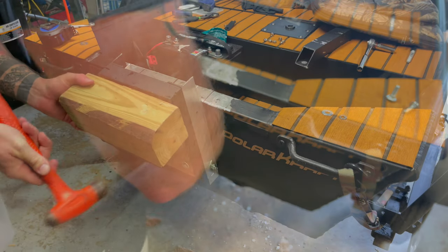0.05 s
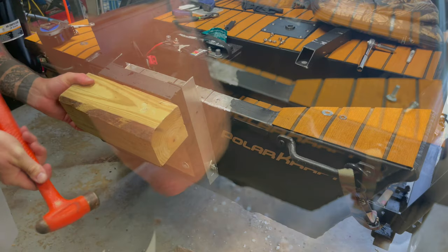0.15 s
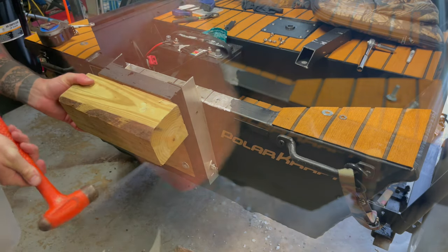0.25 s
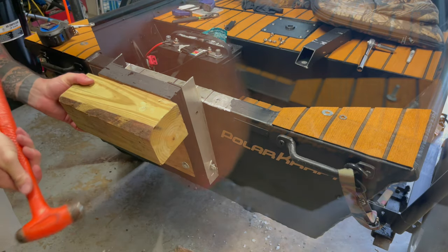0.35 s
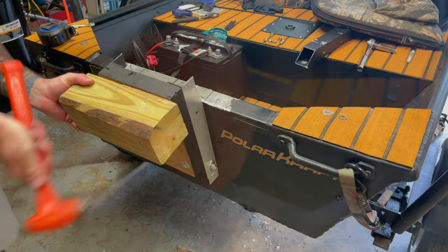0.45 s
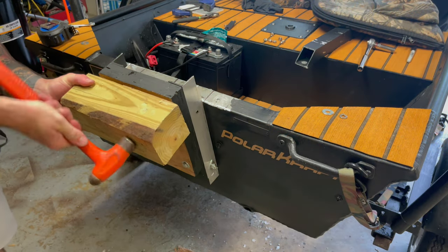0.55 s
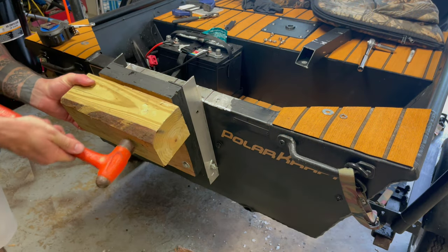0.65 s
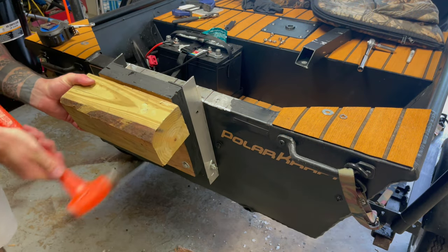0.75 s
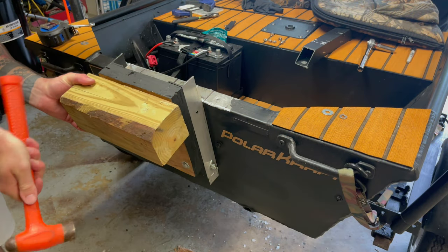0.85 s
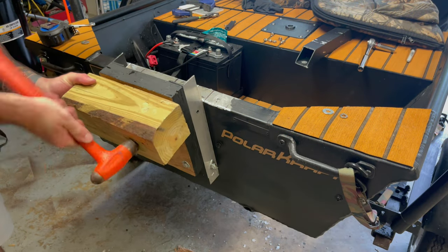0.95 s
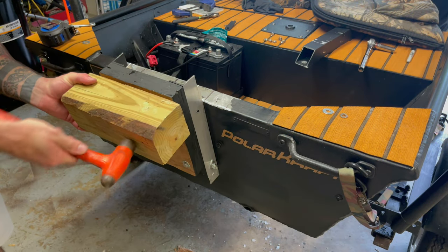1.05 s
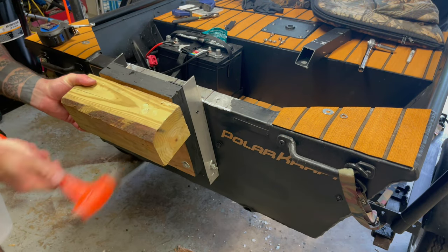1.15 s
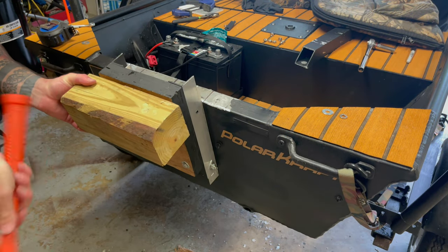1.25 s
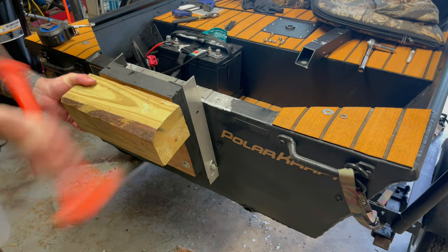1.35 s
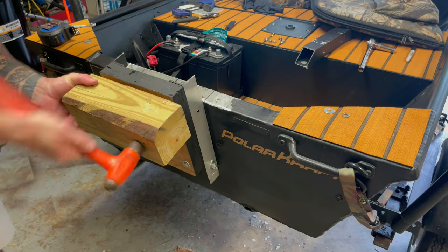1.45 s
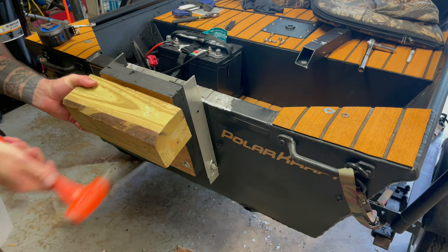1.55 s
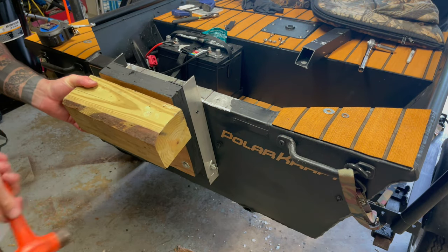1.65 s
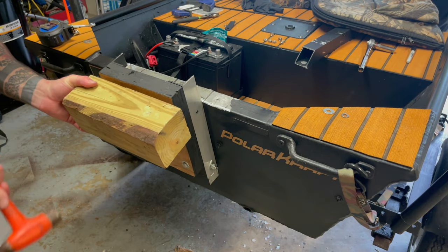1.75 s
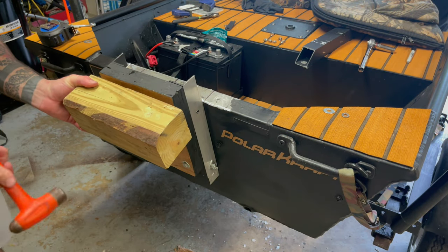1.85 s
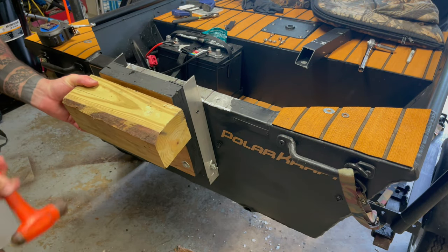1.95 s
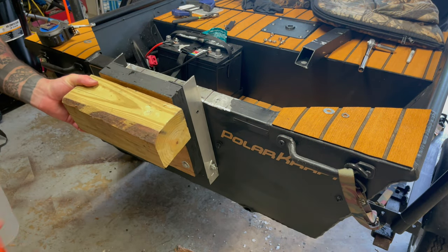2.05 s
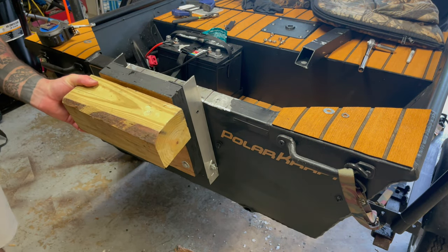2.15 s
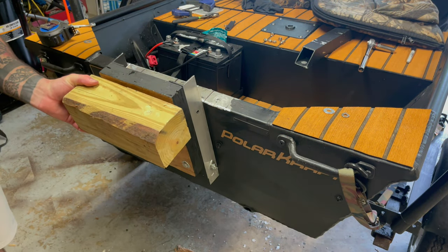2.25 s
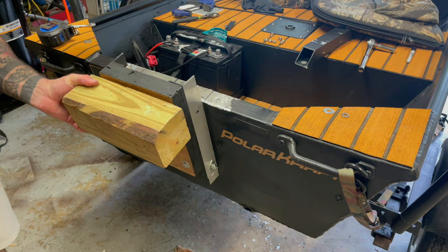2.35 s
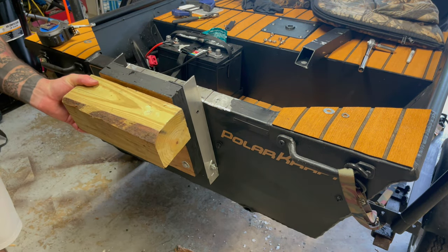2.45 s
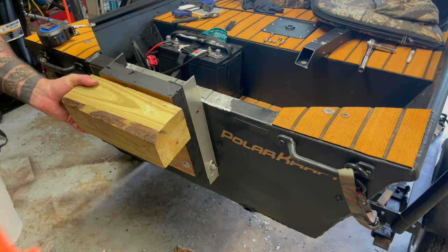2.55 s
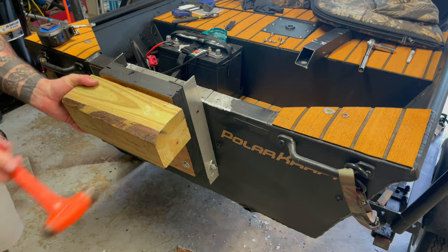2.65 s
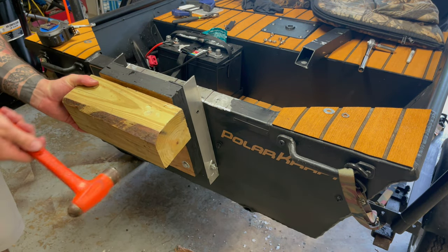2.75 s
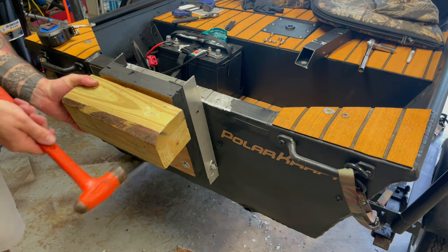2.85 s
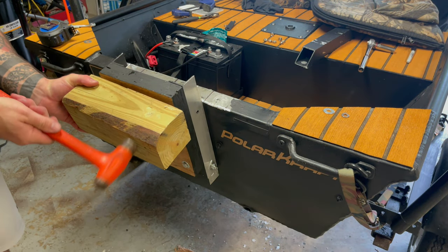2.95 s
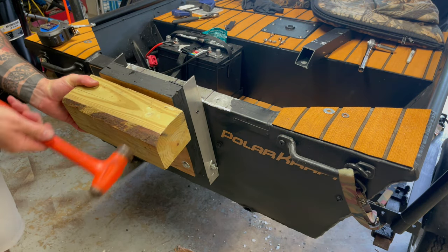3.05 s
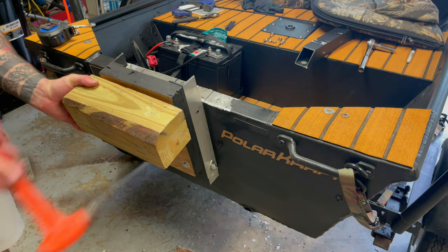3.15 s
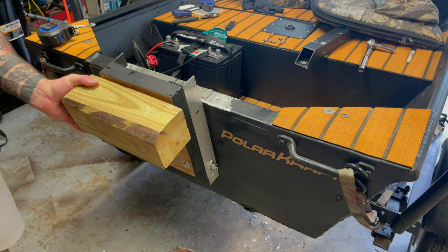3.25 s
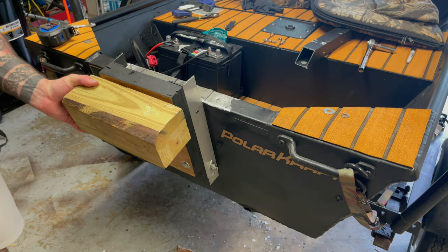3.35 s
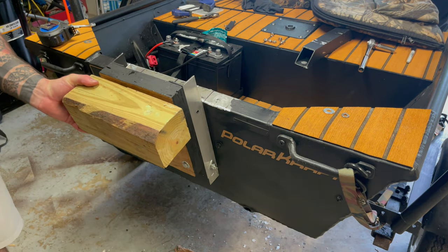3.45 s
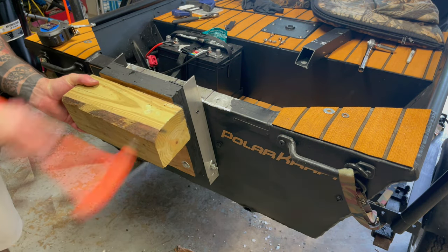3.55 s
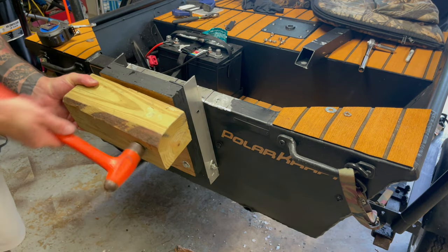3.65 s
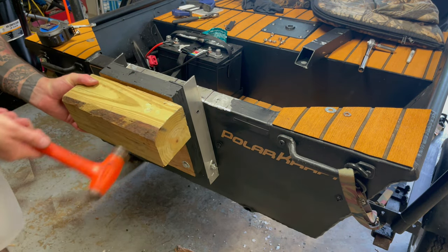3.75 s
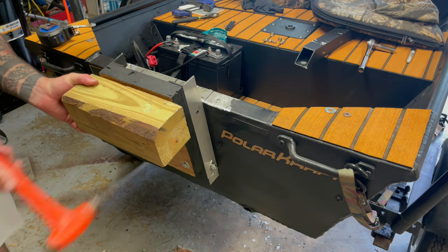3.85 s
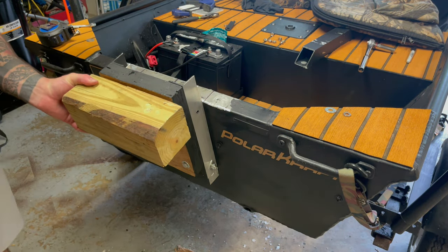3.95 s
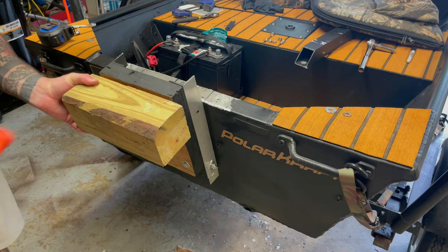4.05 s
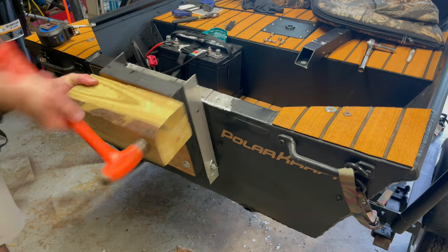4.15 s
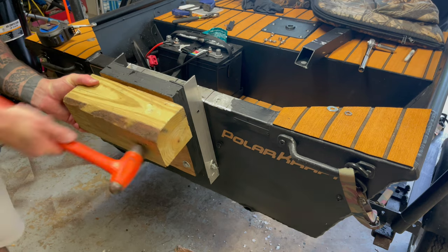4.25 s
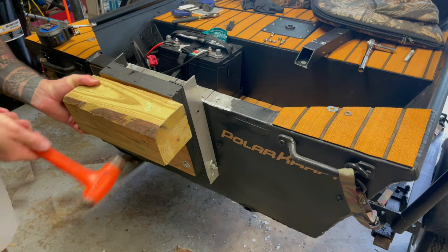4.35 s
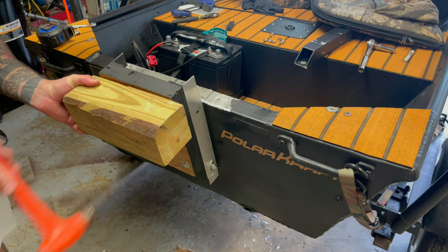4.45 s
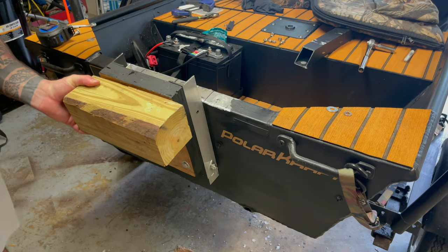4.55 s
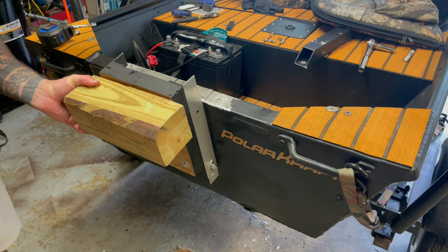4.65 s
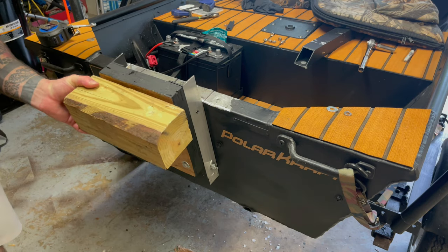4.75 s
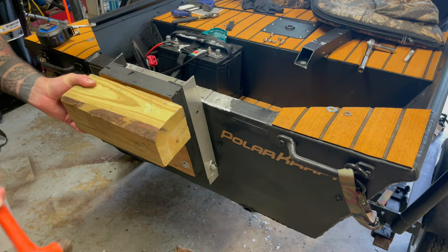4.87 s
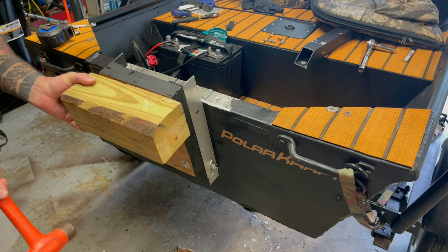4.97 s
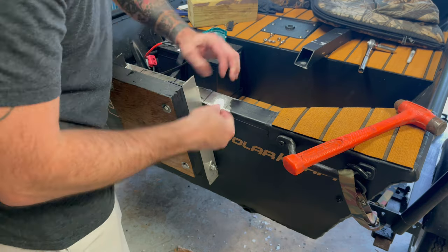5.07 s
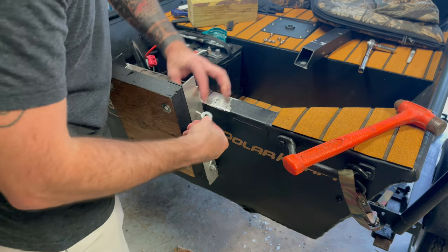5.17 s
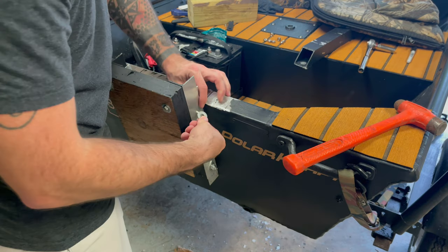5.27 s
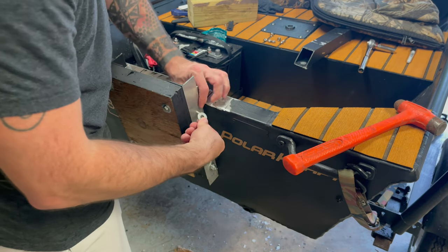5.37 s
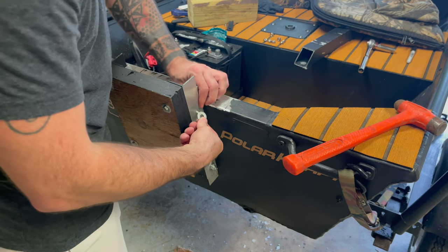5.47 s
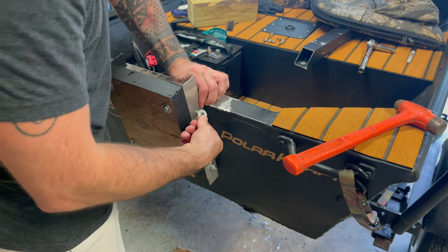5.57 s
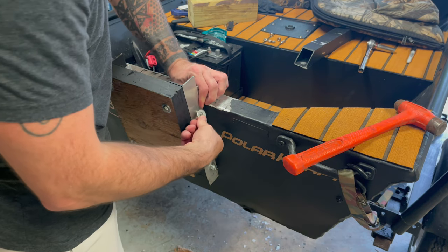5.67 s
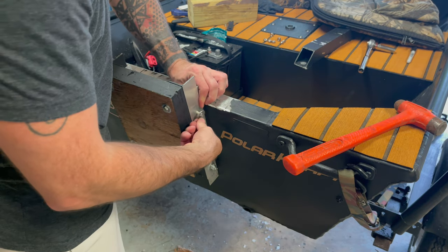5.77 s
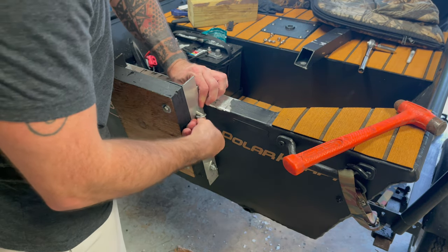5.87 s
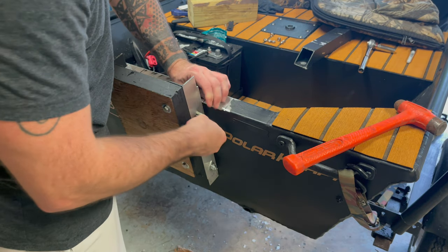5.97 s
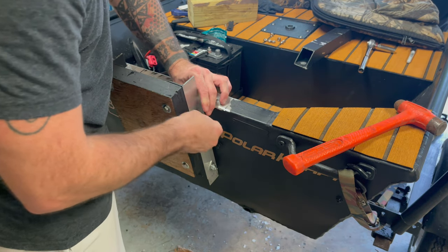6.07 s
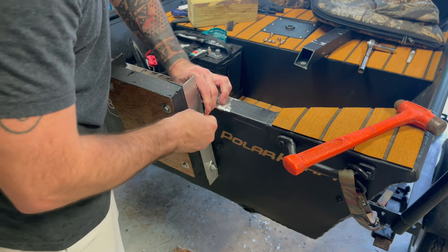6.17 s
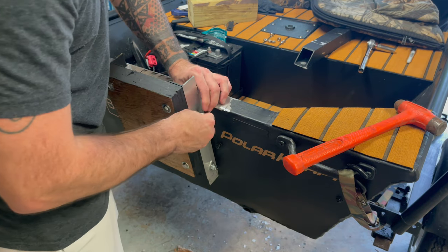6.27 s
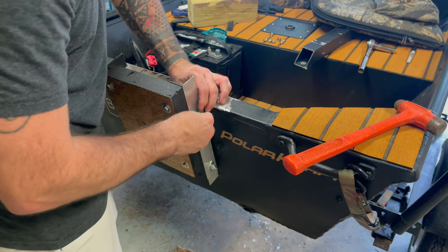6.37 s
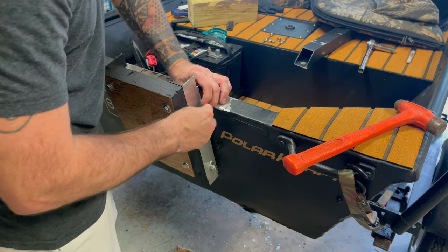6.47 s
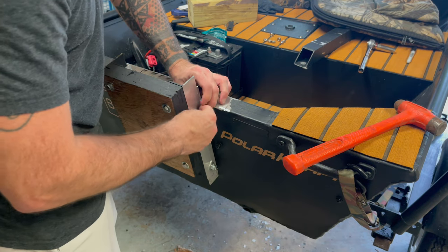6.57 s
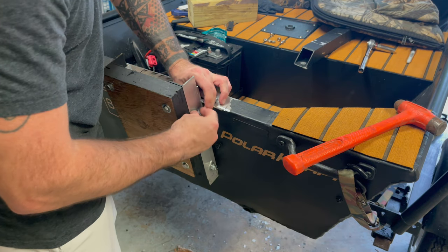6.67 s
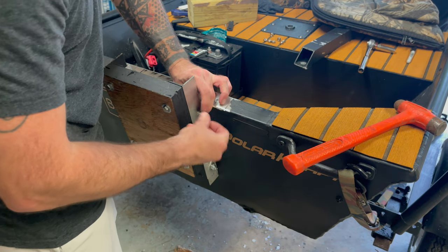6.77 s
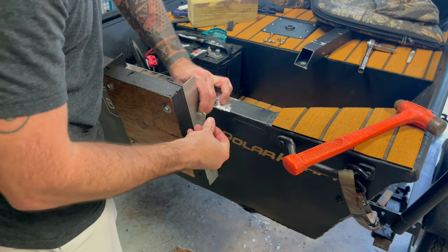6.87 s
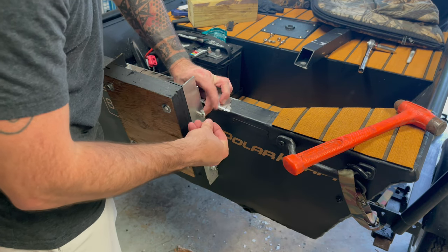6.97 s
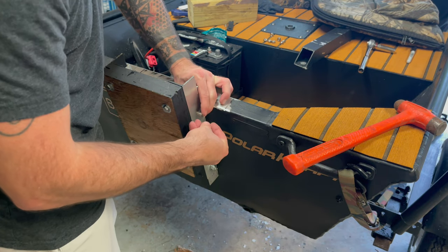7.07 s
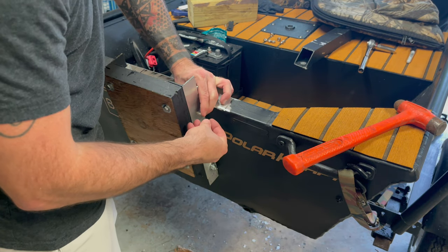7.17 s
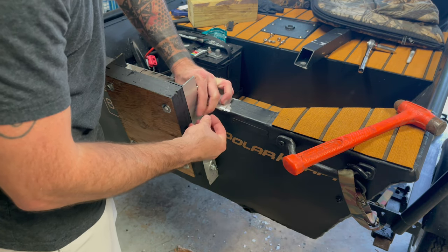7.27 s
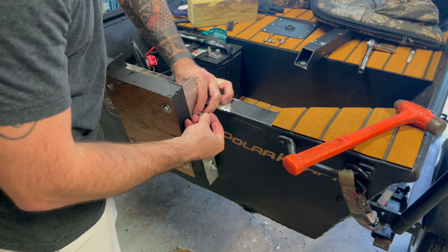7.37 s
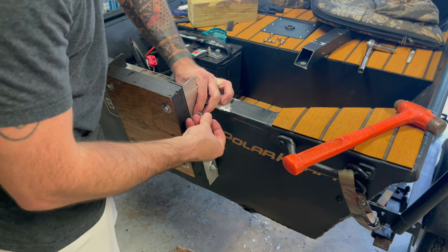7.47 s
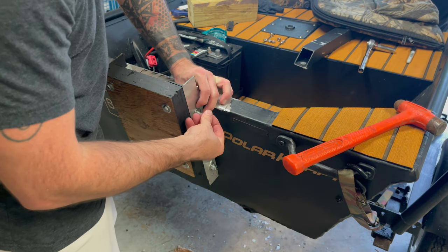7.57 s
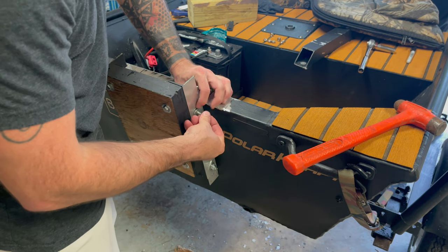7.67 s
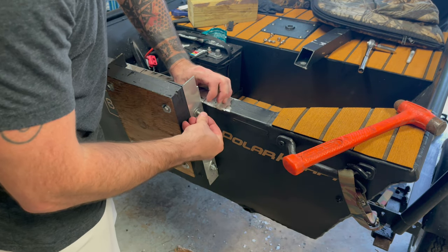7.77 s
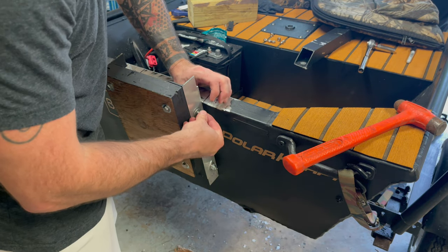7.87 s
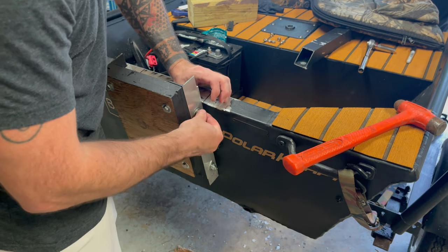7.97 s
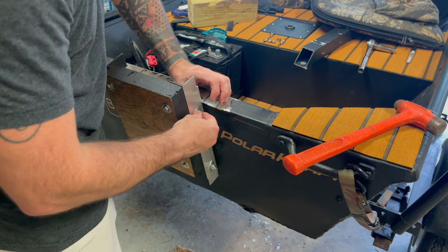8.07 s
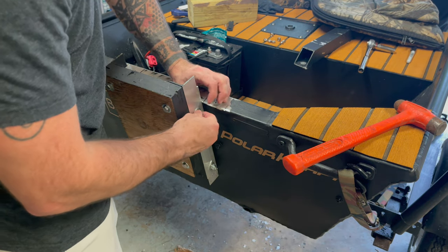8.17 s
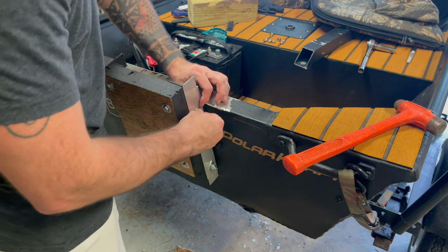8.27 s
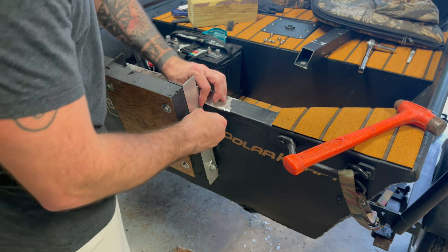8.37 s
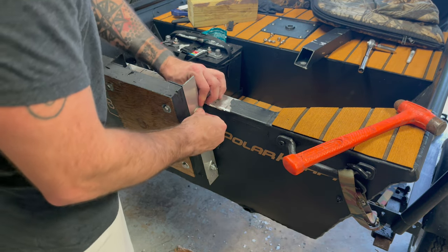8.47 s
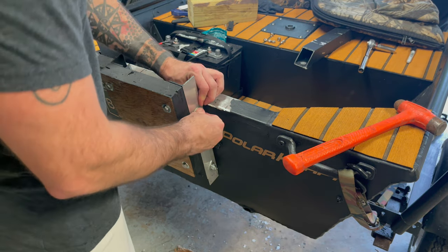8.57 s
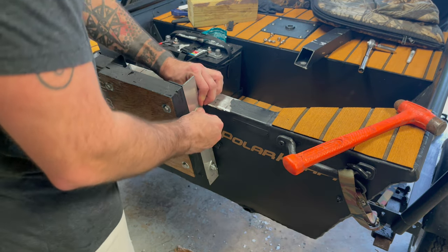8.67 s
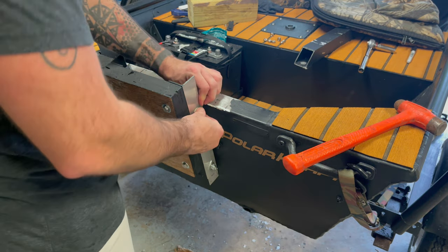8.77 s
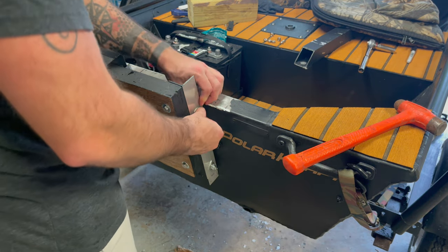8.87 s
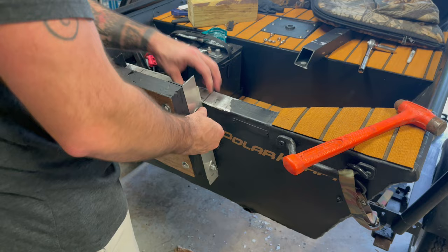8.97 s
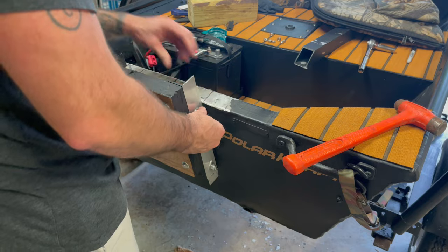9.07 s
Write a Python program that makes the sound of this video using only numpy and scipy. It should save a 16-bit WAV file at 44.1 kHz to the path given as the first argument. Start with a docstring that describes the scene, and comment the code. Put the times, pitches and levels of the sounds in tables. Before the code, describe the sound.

Six mallet blows land on a wooden block against a metal hull, in two groups of three. Most crack sharply, with a boom and a clanging rattle, and the loudest distort slightly. A faint bump follows. The second half is much quieter, as fingers work a bolt against a plate, scuffing, ticking and clinking. Garage hum and hiss continue underneath.

```python
"""A garage hums and hisses throughout, with brief narrow-band noise swells. From 0.5 s a mallet drives
a wooden block against a plate on the stern of a metal boat: the face cracks, the block knocks, the hull
booms and rattles. The loudest blows clip; buzzes follow the two heavy ones at 3.6 and 4.1 s. Two soft
blows land near 4.9 s, then the level dips briefly. Fingers, heard twice between the blows, fit a bolt
from 5.3 s on with small ticks, scuffs and clinks."""
import sys
import numpy as np
from scipy import signal
from scipy.fft import rfft, irfft, next_fast_len
from scipy.io import wavfile
from scipy.ndimage import uniform_filter1d

SR = 44100
rng = np.random.default_rng(int(sys.argv[2]) if len(sys.argv) > 2 else 0)


def materialize(psi):
    """Save the field psi as 16-bit PCM at rate SR to the path in sys.argv[1].

    A 1-D psi becomes a single channel; in a 2-D psi each row is a channel.
    """
    bounded = np.clip(np.atleast_2d(psi).T, -1, 1)
    quanta = np.round(bounded * 32767).astype(np.int16)
    wavfile.write(sys.argv[1], SR, quanta)


N = 402191


def amp(db):
    """Decibels to amplitude."""
    return 10 ** (np.asarray(db) / 20)


def unit_rms(x):
    """Scale to rms 1."""
    return x / np.sqrt(np.mean(x ** 2) + 1e-20)


def curve_at(points, hz):
    """Interpolate (Hz, value) points on a log frequency axis."""
    points_hz, values = np.transpose(points)
    return np.interp(np.log(hz + 1), np.log(points_hz + 1), values)


def filtered(x, response):
    """Apply a frequency response by FFT."""
    n = x.shape[-1]
    padded = next_fast_len(n + 4096)
    return irfft(rfft(x, padded) * response(np.fft.rfftfreq(padded, 1 / SR)), padded)[..., :n]


def noise(n, spectrum, field=lambda hz, t: 1):
    """Two unrelated coloured noises at rms 1, then shaped by a time-frequency gain field."""
    white = rng.standard_normal((2, n))
    pair = unit_rms(filtered(white, lambda hz: amp(curve_at(spectrum, hz))))
    hz, t, cells = signal.stft(pair, SR, nperseg=256)
    return signal.istft(cells * field(hz[:, None], t), SR, nperseg=256)[1][:, :n]


def flicker(depth_db):
    """A random gain field, smooth in frequency and time."""
    def field(hz, t):
        across_bands = uniform_filter1d(rng.standard_normal((len(hz), len(t))), size=4, axis=0)
        return amp(depth_db * unit_rms(uniform_filter1d(across_bands, size=14, axis=1)))
    return field


def ring(modes, t, scatter_db, rise_s, sustain=1, waver_db=0):
    """Damped, wavering modes on two paths, each slightly detuned; signs are random on the second."""
    hz, db, t60_s = np.transpose(modes)[:, :, None]
    draws = rng.standard_normal((4, len(modes), 1))
    strength, detune, polarity = draws[0], draws[1:3], np.sign(draws[3])
    knots = rng.standard_normal((2, len(modes), 41))
    waver = np.array([[np.interp(t, np.arange(41) / 40, k) for k in path] for path in knots])
    level_db = db + scatter_db * strength + waver_db * waver - 60 * t / (t60_s * sustain)
    envelope = amp(level_db) * (1 - np.exp(-t / rise_s))
    envelope[1] *= polarity
    return (envelope * np.sin(2 * np.pi * hz * (1 + 0.0085 * detune) * t)).sum(1)


def add(out, start_s, sound):
    """Mix a sound in from start_s."""
    part = out[:, round(start_s * SR):][:, :sound.shape[1]]
    part += sound[:, :part.shape[1]]


# Each row: time in seconds, then hiss, rush and rumble levels in dB.
ROOM_LEVELS = [(0, -32, -38.5, -45), (.4, -34, -36.5, -43.5), (.92, -30, -41.5, -30.5),
               (1.33, -38.5, -39, -43), (1.55, -50, -45, -39), (2.1, -48, -50, -56.5),
               (2.8, -47, -49, -60.5), (3.45, -46, -47.5, -62), (4.2, -47, -45, -48),
               (4.5, -53, -53.5, -55), (4.9, -47.5, -49.5, -48), (5.18, -50.5, -54.5, -76.5),
               (5.7, -49.5, -52, -76.5), (6.1, -42.5, -45, -65), (6.55, -40.5, -39.5, -51.5),
               (7.0, -40.5, -44, -57), (7.4, -38.5, -39.5, -52.5), (7.9, -38, -39.5, -51.5),
               (8.4, -37.5, -42, -48.5), (9.12, -36, -38, -50)]
# Room noise spectra. Each row: frequency in Hz, level in dB.
RUMBLE_SPECTRUM = [(15, -43.5), (30, -23.5), (55, 3), (85, -8.5), (118, 2), (150, -9), (230, -10.5),
                   (300, -20.5), (400, -17), (600, -38.5), (1000, -120)]
RUSH_SPECTRUM = [(210, -42), (350, -16.5), (597, 2), (780, 0), (1110, 1), (1240, 0), (1350, 0.5),
                 (1830, 1.5), (4500, -5), (5850, -36.5), (9900, -120)]
HISS_SPECTRUM = [(2500, -10), (4000, -6), (5200, -2.5), (6100, 1.5), (7200, -4.5), (9000, -6), (10500, -6),
                 (11700, -11), (12300, -26.5), (12500, -120)]
# Each row: frequency in Hz, level over the rumble in dB.
HUM_TONES = [(118.4, -10), (689, -12.5)]
DUCK_DB, DUCK_DELAY_S, DUCK_DB_PER_S = -49, 0.19, 60.5
LINGER_RUSH_DB, LINGER_RUMBLE_DB, LINGER_T60_S = -23, -20, 1.035


def garage():
    """Hum, rumble, rush and hiss. Blows linger in rumble and rush; the hiss dips after a loud crack."""
    t = np.arange(N) / SR
    times_s, *levels_db = np.transpose(ROOM_LEVELS)
    hiss_db, rush_db, rumble_db = [np.interp(t, times_s, column) for column in levels_db]
    linger = np.zeros(N)
    for start_s, _, _, crack_db, hull_db, *_ in MALLET_BLOWS:
        after = (t > start_s) & (t < DIP_AT_S)
        linger += after * amp(hull_db - 60 * np.abs(t - start_s) / LINGER_T60_S)
        if crack_db > -20:
            ceiling_db = DUCK_DB + DUCK_DB_PER_S * np.abs(t - start_s - DUCK_DELAY_S)
            hiss_db = np.where(after, np.minimum(hiss_db, ceiling_db), hiss_db)
    waver = unit_rms(uniform_filter1d(rng.standard_normal(N), size=6000))
    tones = sum(amp(db + 0.92 * waver) * np.sin(2 * np.pi * hz * t) for hz, db in HUM_TONES)
    hum = amp(rumble_db) * tones * [[1], [.3]]
    rumble_gain = np.hypot(amp(rumble_db), amp(LINGER_RUMBLE_DB) * linger)
    rush_gain = np.hypot(amp(rush_db), amp(LINGER_RUSH_DB) * linger)
    rumble = rumble_gain * noise(N, RUMBLE_SPECTRUM, flicker(depth_db=1.5))
    rush = rush_gain * noise(N, RUSH_SPECTRUM, flicker(depth_db=3.32))
    hiss = amp(hiss_db) * noise(N, HISS_SPECTRUM, flicker(depth_db=2.5))
    return hum + rumble + rush + hiss


# Each row: start in seconds, level in dB, centre in Hz, width in Hz, length in seconds.
NOISE_SWELLS = [(0.317, -34, 1920, 150, .093), (.863, -29.5, 1550, 200, 0.096),
                (1.185, -38, 2660, 300, .12), (1.829, -47.5, 226, 80, 0.15), (2.315, -49.5, 553, 99, 0.13),
                (2.39, -48, 697, 80, .12), (3.598, -46.5, 3600, 400, 0.17), (3.734, -37, 1280, 500, 0.14),
                (4.165, -39, 3670, 400, 0.19), (4.292, -37.5, 1450, 550, .17),
                (6.241, -44, 1440, 550, 0.35), (6.679, -37.5, 2060, 400, .12),
                (7.123, -42, 1170, 450, 0.18), (7.542, -42, 2000, 600, .1), (7.851, -36, 1810, 300, 0.092),
                (8.33, -37.5, 2880, 900, .19), (8.343, -38.5, 1140, 400, 0.1),
                (9.009, -34.5, 2720, 500, 0.091)]


def noise_swells():
    """Brief narrow-band noise swells; those at 3.6-4.3 s are buzzes after the two heavy blows."""
    out = np.zeros((2, N))
    for start_s, db, hz, width_hz, length_s in NOISE_SWELLS:
        n = round(length_s * SR)
        band = [(10, -90), (max(hz - 2 * width_hz, hz / 3), -30), (hz - width_hz / 2, -3), (hz, 0),
                (hz + width_hz / 2, -3), (hz + 2 * width_hz, -30), (9000, -90)]
        swell = np.sin(np.pi * np.sqrt(np.arange(n) / n))
        add(out, start_s, amp(db) * noise(n, band) * swell)
    return out


# Each row: start in seconds, scuff level in dB, tick over scuff in dB, scuff T60 in seconds,
# tilt in dB at 1 kHz against 8 kHz.
FINGER_TOUCHES = [(2.359, -39.5, -9.5, 0.48, -1), (2.7647, -40, -9.5, 0.32, 7),
                  (5.3435, -37, -9.5, 0.31, 16.5), (5.668, -39.5, -12, .3, 1), (5.696, -36, -7.5, 0.18, 2),
                  (5.852, -32, -9, 0.22, -2), (5.874, -31, 6.5, 0.18, 0.5), (6.0386, -37.5, 1, .32, 3),
                  (6.4364, -27, 6.5, 0.26, 9.5), (6.5105, -25.5, 4.5, 0.22, 1),
                  (6.5756, -29.5, -1.5, .12, 6), (6.6895, -30.5, 1, 0.15, 6), (6.7175, -25.5, 4, .16, 4),
                  (7.2794, -22, -7, 0.33, 3.5), (7.2967, -10.5, 1, 0.096, -0.5), (7.3124, -17, 2, .29, -9),
                  (7.3339, -25, 4, 0.36, 9.5), (7.5141, -29.5, 5.5, .27, 4), (7.7119, -28, -2.5, 0.12, -17),
                  (7.7414, -31.5, 5, 0.26, -18.5), (7.8358, -25.5, 7, 0.138, -20),
                  (7.857, -17, -11.5, 0.27, -10.5), (7.8894, -24, -2, 0.31, 3.5),
                  (7.9453, -19.5, -4, 0.2, 0), (8.0007, -21, 1, 0.19, -0.2), (8.0541, -28, 4, .19, -3.5),
                  (8.3386, -33, 2.5, 0.22, -2.5), (8.8695, -28, -3.5, 0.31, 14.5),
                  (9.0102, -32.5, -2, 0.5, 2)]
# Finger scuff and steel-on-steel tick. Each row: frequency in Hz, level in dB.
SCUFF_SPECTRUM = [(150, -31), (250, -22.5), (630, -10.5), (720, -4.5), (1190, -7), (1720, 0), (2590, -3),
                  (6620, 0), (8760, -6.5), (10700, 5.5), (11800, -5), (12400, -44), (12700, -120)]
TICK_SPECTRUM = [(800, -27), (2000, -10.5), (6000, -13.5), (10800, 4.5), (12500, -13.5)]
# Each row: start in seconds, level in dB, frequency in Hz, T60 in seconds.
HOLLOW_CLINKS = [(5.67, -42, 660, .11), (6.09, -33, 692, 0.092), (7.79, -33, 570, 0.18),
                 (7.895, -17, 725, 0.079), (8.245, -25.5, 727, 0.11), (8.28, -21.5, 1290, 0.087),
                 (8.5, -36.5, 167, 0.19), (8.698, -20, 686, 0.19), (9.012, -25, 677, 0.11)]
SCUFF_RISE_S, TICK_T60_S, TOUCH_TOP_HZ = 0.00394, .016, 13000


def fingers():
    """Each touch on bolt and plate is a sharp tick and a grainy scuff; some parts clink."""
    out, t = np.zeros((2, N)), np.arange(SR // 3) / SR
    for start_s, scuff_db, tick_db, t60_s, tilt_db in FINGER_TOUCHES:
        spectrum = [(hz, db + tilt_db * np.log2(8000 / hz) / 3) for hz, db in SCUFF_SPECTRUM]
        grit = amp(1.6 * unit_rms(uniform_filter1d(rng.standard_normal(len(t)), size=60)))
        envelope = amp(-60 * t / t60_s) * (1 - np.exp(-t / SCUFF_RISE_S))
        tick = noise(len(t), TICK_SPECTRUM) * amp(tick_db - 60 * t / TICK_T60_S)
        scuff = noise(len(t), spectrum) * envelope * grit
        add(out, start_s, amp(scuff_db) * (scuff + tick))
    for start_s, db, hz, t60_s in HOLLOW_CLINKS:
        add(out, start_s, ring([(hz, db, t60_s)], t, scatter_db=.5, rise_s=.01, waver_db=4))
    return filtered(out, lambda hz: hz < TOUCH_TOP_HZ)


# Each row: frequency in Hz, level in dB.
RATTLE_SPECTRUM = [(60, -35), (100, -9), (190, -3), (340, -5.5), (625, 0), (800, -7), (1250, -6.5),
                   (2500, -16), (3100, -14), (3700, -15), (4600, -22), (8000, -30), (11000, -20),
                   (12400, -38.5), (12800, -120)]
# Each row: frequency in Hz, T60 in seconds at sustain 1.
RATTLE_DECAY = [(50, 1.27), (130, 0.65), (350, 0.52), (920, 0.57), (2430, 0.18), (6400, 0.17)]


def hull_rattle(t, sustain):
    """Hull and garage answer a blow with noise that dies soonest in the treble."""
    def decay(hz, age_s):
        t60_s = np.clip(sustain * curve_at(RATTLE_DECAY, hz), .03, 3)
        return amp(-60 * age_s / t60_s)
    return noise(len(t), RATTLE_SPECTRUM, decay) * (1 - np.exp(-(t / .01) ** 2))


# Each row: frequency in Hz, level in dB, T60 in seconds, all at pitch factor 1.
BLOCK_MODES = [(627, 3.5, 0.019), (756, -4, 0.018), (1050, -15, 0.029), (1318, -8.5, 0.02),
               (1708, -12, .02), (3516, -14.5, 0.022)]
KNOCK_DELAY_S, WALL_DELAY_S, WALL_DB = .0014, 0.011, -13.5


def block_knock(t, pitch):
    """The wooden block rings briefly; the nearest wall returns the knock."""
    scaled_t = pitch * np.clip(t - KNOCK_DELAY_S, 0, None)
    knock = ring(BLOCK_MODES, scaled_t, scatter_db=4.5, rise_s=0.00067) * [[1.3], [.4]]
    return knock + amp(WALL_DB) * np.roll(knock, round(WALL_DELAY_S * SR), axis=1)


# Each row: frequency in Hz, level in dB.
CRACK_SPECTRUM = [(1500, -25), (3500, -4), (6000, -8.5), (9500, -0.5), (12000, -5.5), (13500, -47.5),
                  (15500, -33)]


def face_crack(t):
    """The mallet face lands with about 2 ms of bright noise."""
    pulse = t / 0.0017 * np.exp(1 - t / 0.0014)
    return noise(len(t), CRACK_SPECTRUM) * pulse * amp(-60 * t / 0.025)


# Modes of the whole hull (deep), large panels (boom), one singing panel (drone), small panels and
# plate (clang). Each row: frequency in Hz, level in dB, T60 in seconds at sustain 1.
DEEP_MODES = [(55.9, -2, 0.96), (84.9, 0, 0.56)]
BOOM_MODES = [(113.5, -11.5, 0.3), (134, -6.5, 0.3), (173.5, 0, 0.2), (227.8, -5.5, 0.26),
              (253.8, -10, 0.36), (293, -11, 0.31), (270, -14, 0.27), (320, -19, 0.54), (361, -14.5, 0.19)]
DRONE_MODES = [(180.5, -20.5, 1.73)]
CLANG_MODES = [(411, -9.5, 0.58), (452, -7, 0.47), (482, 0, 0.34), (516, -15, 0.62), (556, 3, 0.2),
               (617, -2.5, 0.55), (647, -21, 0.2), (709, -1.5, 0.4), (795, -16.5, 0.61), (875, -23, 0.11),
               (977, -21, 0.19), (1160, 5, 0.091), (1260, -14.5, 0.25), (1412, 2, 0.14), (1440, -27, 0.11),
               (1640, -18, 0.19), (1687, -5, 0.19)]
# Each row: start in seconds, knock level in dB, knock pitch factor, then crack, hull, boom and clang
# levels in dB, contact time in ms, sustain factor.
MALLET_BLOWS = [(0.4944, 7, .98, 1, -19, -17.5, -21.5, .04, 1.67),
                (0.9219, 6.5, 1, -5.5, -18, -18, -21, .03, 1.88),
                (1.363, 7, 1, -2, -17, -15, -25, .03, 1.47),
                (2.959, -8.5, 1.03, -28.5, -22.5, -38.5, -31.5, .05, 1.04),
                (2.9688, -0.5, 0.83, -36, -20, -6, -18.5, 1, 0.87),
                (3.554, 5.5, 1.13, 2.5, -13.5, -10, -20.5, .02, 1.35),
                (4.137, 4.5, 1.21, -2, -11, -9.5, -19.5, .02, 1.18),
                (4.914, -33.5, 0.84, -54.5, -38, -27.5, -42, 1.3, 0.59),
                (4.937, -36, 0.81, -65.5, -38.5, -21, -35, 1.6, 1.04)]
DEEP_OVER_HULL_DB, DRONE_DAMPING_DB_PER_MS = -8, 13.5


def mallet():
    """Blows excite block and hull until the dip. Longer contact feeds in less treble and less drone."""
    out, t = np.zeros((2, N)), np.arange(SR) / SR
    for blow in MALLET_BLOWS:
        start_s, knock_db, pitch, crack_db, hull_db, boom_db, clang_db, contact_ms, sustain = blow
        deep_db = hull_db + DEEP_OVER_HULL_DB
        drone_db = boom_db - DRONE_DAMPING_DB_PER_MS * contact_ms
        crack = amp(crack_db) * face_crack(t)
        knock = amp(knock_db) * block_knock(t, pitch)
        deep = ring(DEEP_MODES, t, scatter_db=0, rise_s=0.026, sustain=1.3, waver_db=1)
        boom = ring(BOOM_MODES, t, scatter_db=2, rise_s=0.0054, sustain=sustain, waver_db=5)
        drone = ring(DRONE_MODES, t, scatter_db=-1, rise_s=0.055, waver_db=4.4)
        clang = ring(CLANG_MODES, t, scatter_db=1.4, rise_s=0.0036, sustain=sustain, waver_db=4.5)
        panels = amp(boom_db) * boom + amp(drone_db) * drone + amp(clang_db) * clang
        body = knock + panels + amp(hull_db) * hull_rattle(t, sustain)
        softened = filtered(body, lambda hz: 1 / (1 + 1j * hz * contact_ms / 1000) ** 2)
        add(out, start_s, crack + amp(deep_db) * deep + softened)
    return out * (np.arange(N) < DIP_AT_S * SR)


# Each row: frequency in Hz, left-right correlation for equally loud paths.
PORT_LIKENESS = [(60, 0.98), (200, 0.94), (400, 0.16), (800, 0.05), (5000, 0.016), (7000, 0.075),
                 (8500, 0.28), (9300, 0.94), (9900, 1), (11000, 1), (11800, 0.26)]
# Each row: frequency in Hz, left over right in dB.
PORT_BALANCE = [(60, .5), (500, 2), (1500, 1.5), (5000, 3), (9000, 0)]
TURN_FROM_HZ, TURN_TO_HZ = 8120, 12180  # right gains one cycle on left across this band


def microphone_ports(pair):
    """Two ports take the first path in phase and the second opposed; the top turns in phase."""
    side = np.array([[1], [-1]])

    def path_weights(hz):
        angle = np.arccos(np.clip(curve_at(PORT_LIKENESS, hz), -1, 1)) / 2
        return np.array([np.cos(angle), np.sin(angle)])

    def port_response(hz):
        turn = np.pi * np.clip((hz - TURN_FROM_HZ) / (TURN_TO_HZ - TURN_FROM_HZ), 0, 1)
        return amp(side * curve_at(PORT_BALANCE, hz) / 2) * np.exp(-1j * side * turn)

    shared, opposed = filtered(pair, path_weights)
    return filtered(shared + side * opposed, port_response)


def scene():
    """Blows, fingers, noise swells and room at the two ports."""
    return microphone_ports(mallet() + fingers() + noise_swells() + garage())


DIP_AT_S, DIP_HALF_S = 5.107, .035
BASS_CUT_HZ, TOP_HZ = 30, 16100


def record(dry):
    """A brief level dip, a bass cut, hard clipping and a band limit."""
    dip = np.clip(np.abs(np.arange(N) / SR - DIP_AT_S) / DIP_HALF_S, .05, 1)
    thinned = filtered(dry * dip, lambda hz: (1j * hz / (1j * hz + BASS_CUT_HZ)) ** 6)
    clipped = np.clip(thinned, -1, 1)
    band_limited = filtered(clipped, lambda hz: np.clip((TOP_HZ - hz) / (TOP_HZ / 20), 0, 1))
    return np.clip(band_limited, -1, 1)


dry = scene()
out = record(dry)
materialize(out)
```